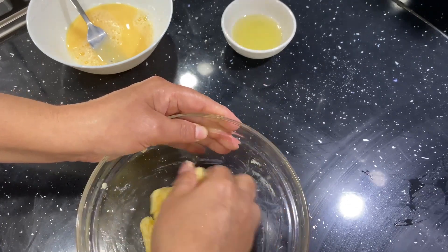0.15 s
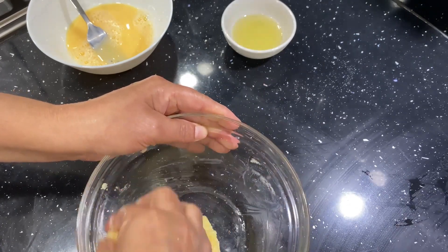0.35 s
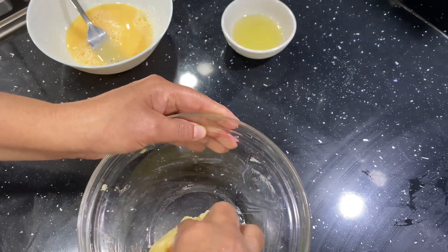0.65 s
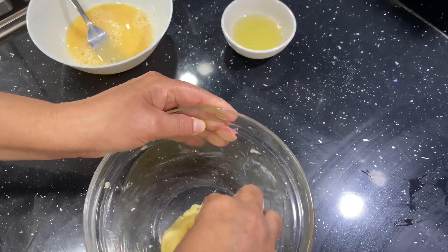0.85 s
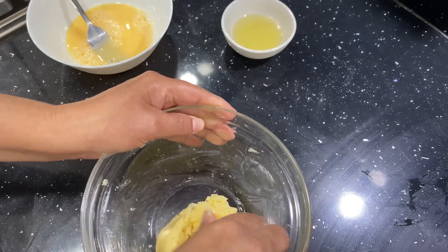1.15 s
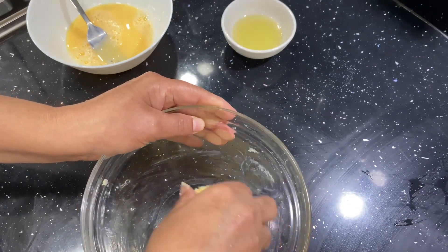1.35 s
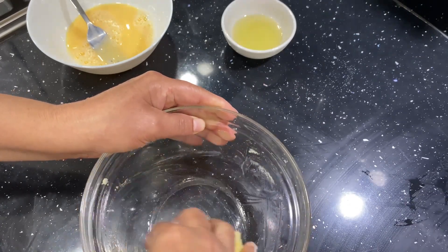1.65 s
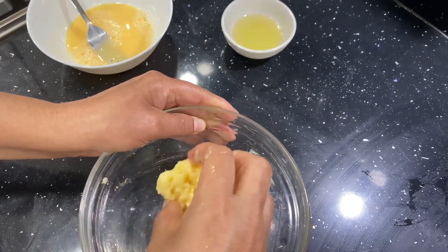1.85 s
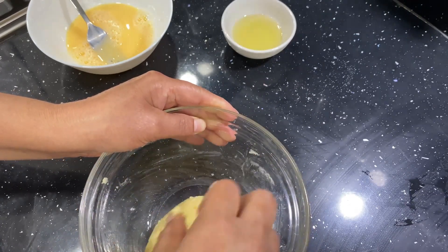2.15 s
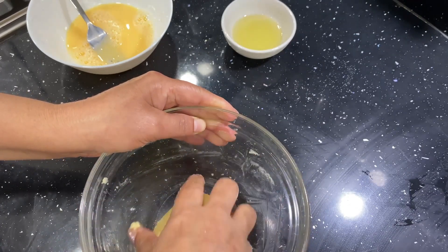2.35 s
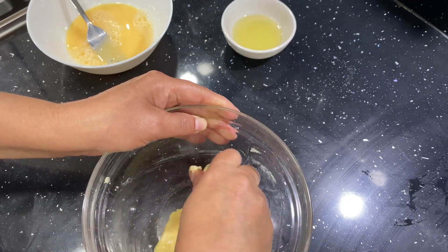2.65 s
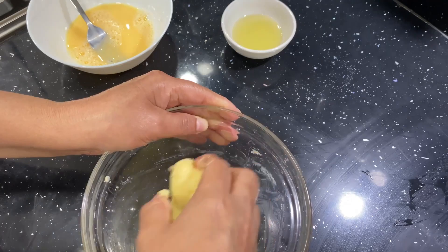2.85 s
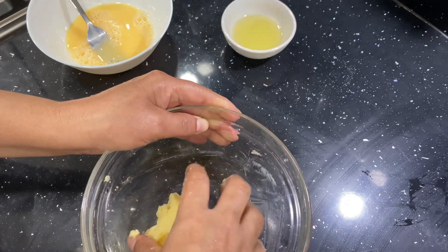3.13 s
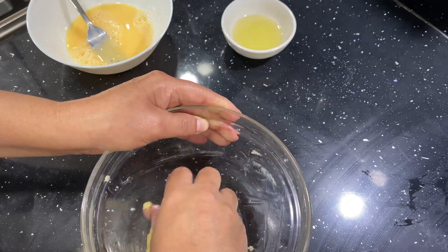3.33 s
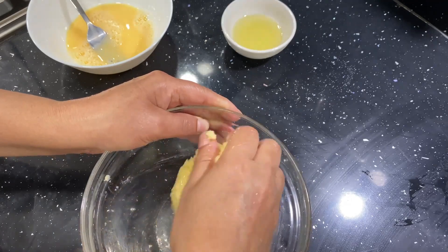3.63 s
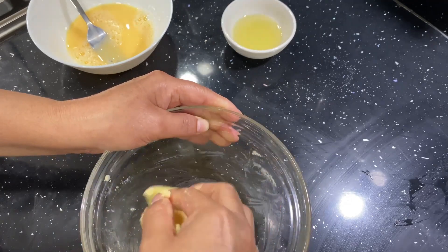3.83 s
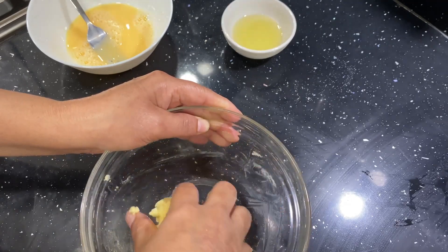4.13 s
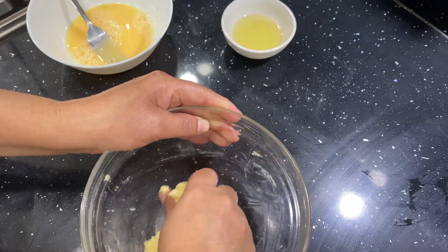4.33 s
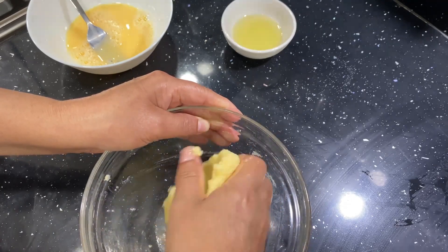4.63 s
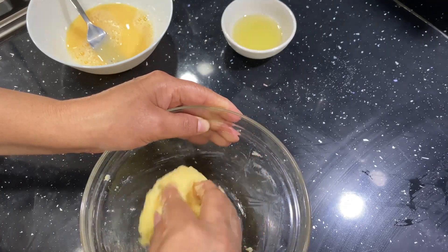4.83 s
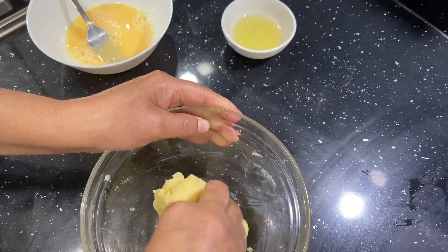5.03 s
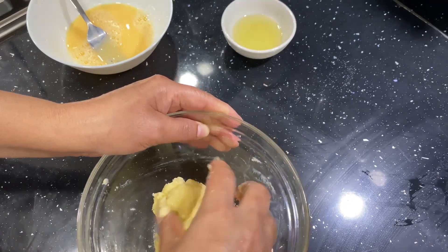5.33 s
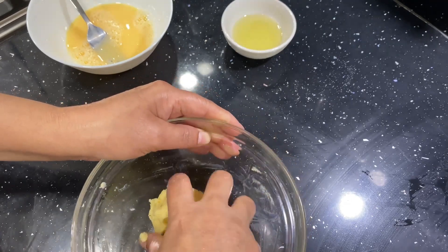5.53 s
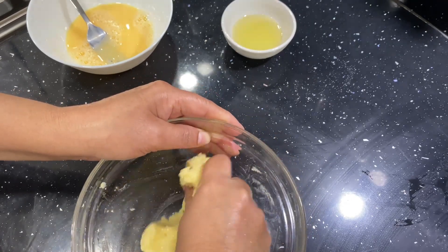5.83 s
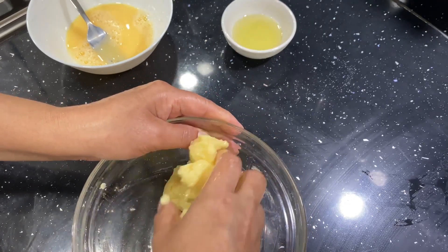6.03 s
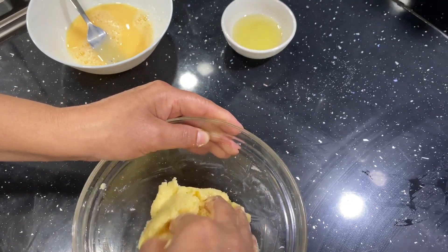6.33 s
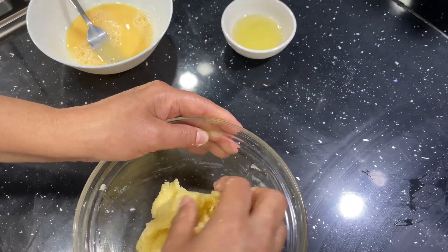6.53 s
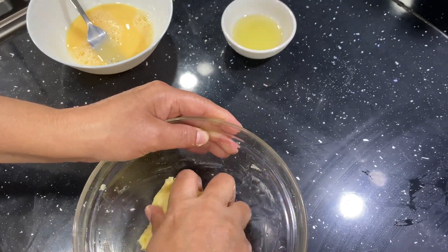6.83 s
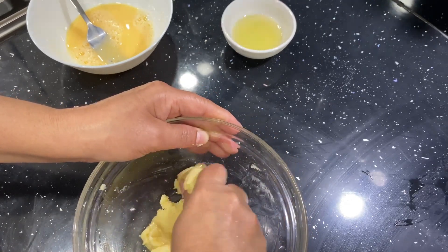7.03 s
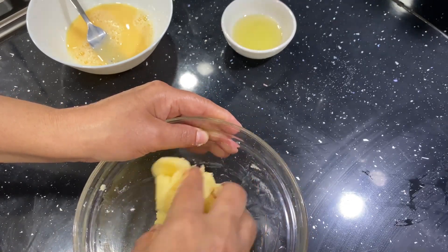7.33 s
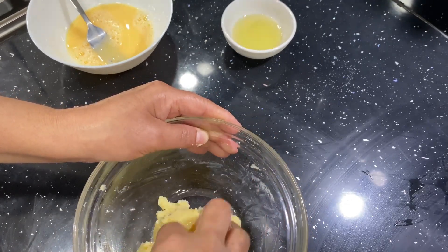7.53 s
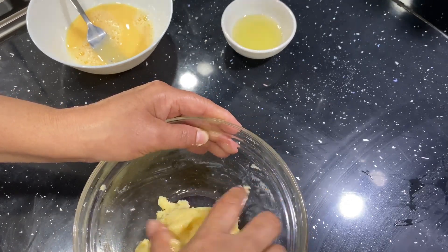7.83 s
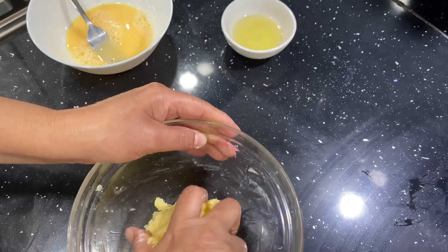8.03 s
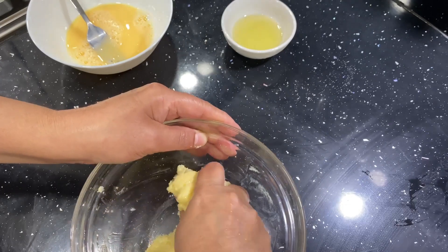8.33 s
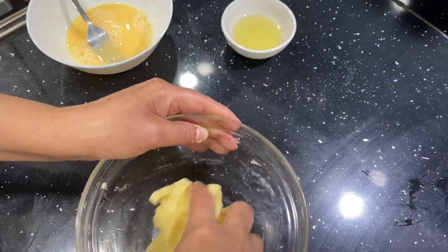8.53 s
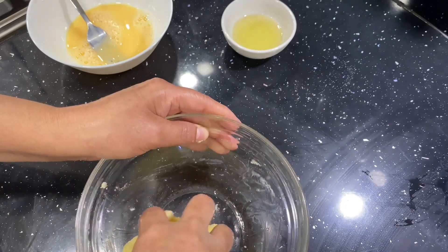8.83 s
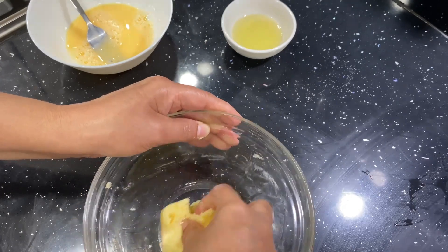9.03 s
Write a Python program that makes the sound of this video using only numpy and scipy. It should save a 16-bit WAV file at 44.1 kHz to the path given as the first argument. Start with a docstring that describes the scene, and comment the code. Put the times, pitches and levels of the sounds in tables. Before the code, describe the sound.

Heard close from above in a quiet kitchen, a hand works oily dough that squelches softly and peels off glass and skin with fine crackles. A few dull bumps lead to a single sharp, loud knock of the glass bowl on the stone counter. Kneading continues in irregular squeezes, with popping air pockets, light knocks and low scrapes. Later, a barely audible motor rises and fades over the low room hum.

```python
"""Soft, oily dough fizzes, crackles and snaps as a hand kneads it and it peels off glass and skin.
Air pockets squelch and pop. The glass bowl rocks, drags and knocks on a stone kitchen counter,
loudest at 1 s. A quiet room hums behind; a far motor whines faintly from about 6 to 8 s.
Heard at two microphones above the bowl."""
import sys
import numpy as np
from scipy import signal
from scipy.fft import rfft, irfft, next_fast_len
from scipy.io import wavfile
from scipy.ndimage import uniform_filter1d, map_coordinates

SR = 44100
rng = np.random.default_rng(int(sys.argv[2]) if len(sys.argv) > 2 else 0)


def master(y):
    """Save y as 16-bit WAV."""
    cut = np.clip(np.atleast_2d(y).T, -1, 1)
    pcm = np.round(cut * 32767)  # scale
    wavfile.write(sys.argv[1], SR, pcm.astype(np.int16))


N = 404397

# kneading: time_s, fizz_db, hollow_over_fizz_db, treble_over_fizz_db
KNEAD_LEVELS = [(0.0, -94, 31, -15), (0.05, -71, -16, -5), (0.07, -66.5, -12, -4.5), (0.15, -53.5, -8, -2),
                (0.23, -63, -3.5, 5.5), (0.28, -62, -6, 0.5), (0.3, -62.5, -3, 0), (0.41, -73, 0.5, -3),
                (0.54, -65.5, -7.5, 2.5), (0.64, -67, -6, -1), (0.66, -69.5, -2, 4), (0.69, -62, -9.5, 3.5),
                (0.76, -73.5, 3.5, -4), (0.81, -62, -7, -1), (0.92, -62, -7, -3), (0.97, -88, -3, -6),
                (1.02, -56, 19.5, -13), (1.07, -67.5, 22, -21), (1.15, -76, 15.5, 0), (1.23, -75, 5.5, 3.5),
                (1.25, -65.5, -0.5, 4.5), (1.28, -61.5, -8, -5), (1.35, -72, -1, 4), (1.38, -56, -14.5, 2),
                (1.4, -54.5, -5, -1), (1.5, -67, -5, -2.5), (1.84, -92, 6, 14), (1.89, -70.5, 8.5, 1.5),
                (1.94, -73, -8, 3.5), (1.99, -86, 0, 8), (2.19, -92, 7, -10.5), (2.27, -78.5, 4.5, 5),
                (2.42, -71.5, 4, 1.5), (2.48, -54.5, 0, -6), (2.5, -58.5, -1, -5), (2.58, -63, -7, -0.5),
                (2.6, -62, 2, -2), (2.68, -60, -8.5, 2), (2.76, -74, -5.5, -0.5), (2.93, -84.5, -4.5, 5.5),
                (2.99, -65.5, -11.5, -2), (3.09, -76, -5.5, 3.5), (3.14, -66, -8.5, -4.5),
                (3.17, -67, 3.5, -2), (3.22, -65, -4, -3), (3.37, -63.5, -2.5, 2.5), (3.4, -56.5, -1.5, -3),
                (3.42, -59.5, -2.5, -2), (3.52, -73.5, -2.5, -3.5), (3.57, -58, -8.5, -6.5),
                (3.62, -60, -16, -9.5), (3.65, -64.5, 3.5, -2.5), (3.73, -83, -4.5, 2),
                (3.78, -75, -4.5, 3.5), (3.98, -87.5, 1.5, 1), (4.03, -92.5, -5, 11.5), (4.06, -64, 3, -1),
                (4.09, -77, -2, 2), (4.11, -64, -4, -11), (4.19, -65, 0.5, -4), (4.29, -67, 4, 0.5),
                (4.31, -61, 3, -8), (4.34, -55.5, -3, 0.5), (4.39, -53, -10, -5.5), (4.47, -69.5, 3.5, -3),
                (4.57, -60, -5.5, -1.5), (4.72, -79.5, 0.5, 5), (4.83, -80, -5.5, 9.5),
                (4.85, -70.5, -8.5, 8.5), (4.93, -62, -3, 3.5), (4.98, -68.5, -12, 3),
                (5.05, -57, -7.5, 0.5), (5.08, -64, -5, 1), (5.13, -60, -9, -0.5), (5.16, -82, 1, -3),
                (5.21, -94.5, 14, -14.5), (5.39, -78.5, 10, -2), (5.54, -69, 0, 0), (5.8, -63.5, -2.5, 1.5),
                (5.82, -80.5, 8, 8.5), (5.85, -83.5, 4.5, -4.5), (5.92, -53, -10, 0.5),
                (6.03, -76.5, 2.5, -2), (6.05, -71.5, -8.5, 3.5), (6.13, -67, -4.5, 4), (6.18, -58, -10, 0),
                (6.26, -75.5, -4, 5), (6.38, -65.5, -6, 2.5), (6.49, -89.5, 4, 3), (6.61, -86, 6.5, 5),
                (6.66, -72.5, -1, 4), (6.72, -77, 9.5, 3.5), (6.74, -64, -5, -1), (6.77, -72, 0, 0.5),
                (6.87, -57, -5, -7.5), (6.97, -60.5, -7, -1), (7.02, -70.5, 12.5, 3.5), (7.05, -65, 2, 3.5),
                (7.1, -73.5, 7, 4.5), (7.15, -59.5, -2, 1), (7.3, -77, -4.5, 8.5),
                (7.38, -67.5, -6.5, -0.5), (7.41, -59.5, -11, 1.5), (7.46, -69, 1, -4.5),
                (7.48, -65.5, -10.5, 2.5), (7.53, -82.5, -3.5, -3.5), (7.56, -56, -4, -4),
                (7.59, -66, 0, 8), (7.69, -85, 6.5, -9), (7.84, -86, 11.5, -5), (7.97, -65.5, 2, -1.5),
                (8.02, -65, -3.5, 1.5), (8.07, -60, 4, 5), (8.1, -66.5, -1, 1), (8.12, -66, 3, 7.5),
                (8.22, -57.5, -8, 0), (8.25, -62.5, -4.5, -6), (8.33, -66.5, -5, 1), (8.4, -56.5, -4.5, -2),
                (8.48, -67.5, 2.5, 5), (8.53, -68, -9.5, 2), (8.55, -73, -2, 6.5), (8.58, -61, -10.5, -7),
                (8.63, -76, -6.5, 3), (8.78, -66, -4.5, -8), (8.86, -67, 0.5, 5), (8.94, -60, -4.5, -4),
                (8.96, -60, -6, -3), (8.99, -73, -2.5, 1), (9.04, -69, -17.5, -2.5), (9.09, -72, -4.5, 4),
                (9.17, -58, -7.5, -0.5)]
# bursting oil films, body and top: freq_hz, gain_db
FIZZ_SPECTRUM = [(1200, -36.5), (2200, -8), (3500, -4), (6000, 0.5), (9000, -8), (13000, -16.5),
                 (17000, -37)]
TREBLE_SPECTRUM = [(5000, -41), (8000, -19.5), (10000, -1), (13000, -4.5), (16500, -4.5)]
# hollow midrange of the bowl: freq_hz, gain_db
HOLLOW_SPECTRUM = [(400, -40), (750, -4.5), (1020, -0.5), (1250, -2.5), (1500, -2), (1850, -7.5),
                   (2300, -9), (2900, -15.5), (4000, -38)]
# bowl shifting: time_s, rumble_db, scrape_db
DRAG_LEVELS = [(0.0, -66, -52), (0.07, -67, -67), (0.15, -63.5, -60), (0.25, -56, -77), (0.33, -66, -58),
               (0.51, -63, -61.5), (0.61, -66, -74.5), (0.79, -84, -61), (0.89, -71, -67), (1.07, -85, -80),
               (1.12, -78, -80), (1.23, -73, -58.5), (1.28, -78, -71), (1.61, -74.5, -72.5),
               (2.19, -75, -78.5), (2.3, -69, -55), (2.42, -76, -88), (2.48, -75, -76), (2.55, -65, -63),
               (2.73, -73.5, -72), (2.83, -78.5, -83.5), (3.04, -73.5, -72.5), (3.27, -73.5, -69.5),
               (3.45, -78.5, -75.5), (3.96, -75.5, -77), (4.06, -72, -75.5), (4.19, -69, -78),
               (4.24, -67, -66.5), (4.36, -77, -73), (4.62, -76.5, -76.5), (4.9, -75.5, -75),
               (5.03, -69, -71.5), (5.13, -73, -69.5), (5.39, -78, -63), (5.52, -65, -77),
               (5.59, -71, -67.5), (5.77, -75, -66), (6.03, -72, -79.5), (6.18, -72, -75),
               (6.54, -74.5, -76.5), (6.69, -68.5, -64.5), (6.79, -74.5, -71.5), (6.95, -72.5, -75.5),
               (7.35, -76, -77), (7.53, -74, -74), (7.84, -74.5, -68), (7.97, -61, -58), (8.1, -73, -68.5),
               (8.22, -63, -65.5), (8.38, -68, -69), (8.53, -73, -60), (8.63, -74.5, -84),
               (8.86, -75, -69.5), (9.04, -75.5, -72.5), (9.17, -76.5, -64)]
# bowl rubbing on stone: freq_hz, gain_db
RUMBLE_SPECTRUM = [(20, -29.5), (35, -5), (50, 2), (90, -7.5), (150, -14), (400, -55)]
SCRAPE_SPECTRUM = [(60, -26.5), (120, -0.5), (170, -4.5), (300, -4), (600, -9.5), (1200, -36.5)]
# room air and microphone hiss: freq_hz, gain_db
HUSH_SPECTRUM = [(60, -20), (110, 2.5), (200, -10), (350, -13), (700, -20), (1300, -14.5), (1600, -13.5),
                 (2100, -30), (4000, -27.5), (8000, -33.5), (11000, -30.5), (16000, -32)]
# bowl's foot landing: start_s, level_db, hardness_db, weight_db, rise_s, ring_ratio
FOOT_KNOCKS = [(0.004, -41.5, -4, -36, 0.0024, 1.38), (0.044, -45, -6, -23, 0.0027, 0.62),
               (0.109, -50, -24, -6, 0.004, 1.3), (0.145, -38, -38, -22, 0.0044, 1.6),
               (0.162, -32.5, -44, -17, 0.0049, 1.1), (0.184, -33, -45, -14, 0.0046, 0.9),
               (0.21, -36.5, -42, -16, 0.004, 1.4), (0.27, -34.5, -42, -14, 0.0033, 0.62),
               (0.292, -27, -8, -26, 0.0032, 0.9), (0.378, -44, -36, -22, 0.0032, 2),
               (0.864, -50, -1.5, -6, 0.0034, 2.3), (0.932, -45, -13, -12, 0.0026, 0.67),
               (1.002, -6, 10, -14, 0.0019, 1), (1.181, -41, -12, -10, 0.0035, 1.2),
               (1.482, -52, -33.5, -5.5, 0.0048, 1.27), (1.879, -41, -17.5, 0.5, 0.003, 0.79),
               (2.256, -33, -15.5, -23, 0.0015, 0.76), (2.336, -38, -14.5, -5, 0.0025, 0.93),
               (2.495, -34, -26, -12, 0.0045, 1.12), (2.645, -43, -11, -16, 0.0032, 0.81),
               (2.681, -50, -26, -19, 0.0022, 0.81), (3.125, -35, -7, -8, 0.0072, 1),
               (3.167, -41, 1, -19, 0.0021, 0.81), (3.65, -38, -16.5, -2.5, 0.0033, 0.95),
               (4.059, -28.5, -7.5, -19.5, 0.0019, 0.72), (4.104, -42, -15, 1, 0.0048, 1.05),
               (4.143, -65, -11, -2, 0.0044, 1.05), (4.292, -47, -14, -4, 0.0021, 0.83),
               (4.61, -51, -25.5, 5, 0.0026, 0.75), (5.373, -41.5, -5.5, 2, 0.0037, 1.5),
               (5.432, -36.5, -7, -6, 0.0044, 0.9), (5.45, -43.5, -14, -17, 0.0032, 1.63),
               (5.984, -44.5, -25.5, -9, 0.0042, 1), (6.372, -47, -25.5, -3.5, 0.0038, 0.83),
               (6.601, -50.5, -9, -20, 0.0054, 1.3), (6.658, -51, -6, -13.5, 0.0047, 1.24),
               (7.768, -56.5, -37, -11, 0.0034, 1.08), (7.894, -34.5, -15, -26, 0.0045, 1.13),
               (7.929, -49, 1, -27, 0.0047, 1.4), (8.22, -48, -22, -11, 0.0052, 1.2),
               (8.48, -49.5, -1, -17.5, 0.0026, 1.1), (8.957, -49.5, -21.5, -28, 0.0044, 1.14)]
# bowl and counter ringing: pitch_hz, level_db, base_t60_s
BOWL_MODES = [(55, -3.5, .2), (106, -5, .15), (131.7, -12.5, 0.16), (163.6, -4.5, .11), (263, -14, 0.16),
              (299.2, -2, 0.077), (399, -10, 0.2), (456.5, -6, 0.18), (578.2, 3.5, 0.064), (666, -4, 0.048),
              (738, 1, 0.078), (827, 0, 0.043), (929, -0.5, 0.074), (1122, -7.5, 0.043), (1268, -10, .04),
              (1519, -20, .05), (1970, -18, 0.055), (2136, -25.5, 0.044)]
# sticky film letting go: start_s, level_db, centre_hz, t60_s
FILM_SNAPS = [(0.0298, -55, 11950, 0.016), (0.0422, -44, 14800, 0.02), (0.0707, -66, 2600, 0.02),
              (0.0707, -46, 7500, 0.018), (0.0841, -46, 7640, 0.02), (0.1067, -39, 4050, 0.029),
              (0.1452, -33, 10200, 0.02), (0.1645, -42, 11200, 0.02), (0.194, -38, 10400, 0.02),
              (0.3042, -42.5, 5550, 0.029), (0.3267, -47.5, 11600, 0.026), (0.4783, -49.5, 11000, 0.026),
              (0.4858, -47, 10900, 0.02), (0.5267, -74, 2520, 0.023), (0.5258, -36.5, 7700, 0.02),
              (0.5711, -39, 6900, 0.019), (0.6485, -48, 7200, 0.02), (0.6654, -40, 7240, 0.022),
              (0.7218, -42, 11100, 0.02), (0.7524, -43, 10900, 0.02), (0.7821, -53, 7270, 0.02),
              (0.7951, -45, 7360, 0.02), (0.842, -46, 11600, 0.02), (0.9163, -48.5, 3770, 0.02),
              (1.0066, -23, 2600, 0.02), (1.1807, -53, 10300, 0.02), (1.2237, -44, 10300, 0.02),
              (1.2435, -55, 10900, 0.02), (1.2548, -42.5, 5970, 0.022), (1.283, -36.5, 10300, 0.02),
              (1.3299, -43.5, 5140, 0.023), (1.3557, -59, 12000, 0.02), (1.3723, -36, 10400, 0.02),
              (1.3897, -37, 11000, 0.02), (1.6816, -57.5, 14200, 0.023), (1.6811, -45, 10900, 0.023),
              (1.8543, -51, 10600, 0.023), (1.9001, -49.5, 11100, 0.02), (2.3376, -58, 3430, 0.022),
              (2.3875, -47.5, 11600, 0.018), (2.4239, -51, 11700, 0.022), (2.4354, -46, 7770, 0.021),
              (2.4633, -39.5, 3370, 0.046), (2.577, -39.5, 7400, 0.016), (2.5965, -43, 4880, 0.026),
              (2.6189, -45, 11100, 0.02), (2.6543, -39, 4830, 0.016), (2.6871, -40, 5510, 0.022),
              (2.7646, -53.5, 4630, 0.024), (2.8218, -43.5, 11470, 0.016), (2.8649, -53, 10900, 0.019),
              (2.9746, -49, 5470, 0.026), (3.049, -47.5, 3890, 0.02), (3.1532, -42.5, 3580, 0.018),
              (3.1762, -58, 4100, 0.019), (3.2046, -43, 10600, 0.018), (3.2844, -43, 10800, 0.018),
              (3.323, -49.5, 11300, 0.02), (3.3573, -42, 10700, 0.019), (3.3872, -38, 7450, 0.023),
              (3.486, -44, 10500, 0.02), (3.5314, -50, 4980, 0.017), (3.5453, -47, 6000, 0.016),
              (3.5688, -40, 4870, 0.026), (3.6484, -53, 11200, 0.02), (3.7539, -55, 3690, 0.0202),
              (3.7703, -45.5, 14400, 0.02), (3.7959, -45, 11700, 0.024), (3.8851, -49.5, 11500, 0.026),
              (4.0582, -54.5, 7010, 0.018), (4.1045, -39.5, 4200, 0.02), (4.1425, -48, 4430, 0.022),
              (4.3181, -32, 6300, 0.049), (4.3755, -26, 3220, 0.027), (4.4016, -41, 3420, 0.027),
              (4.4938, -45, 5480, 0.029), (4.6179, -52, 15000, 0.022), (4.6967, -50.5, 10650, 0.023),
              (4.7511, -66, 14700, 0.02), (4.7511, -45, 11160, 0.02), (4.8394, -49.5, 11900, 0.019),
              (4.8579, -42, 10900, 0.018), (4.8825, -37, 11100, 0.018), (4.9706, -47, 15000, 0.02),
              (5.001, -52, 15100, 0.02), (5.03, -43.5, 11200, 0.02), (5.0467, -40, 7400, 0.036),
              (5.105, -47, 3700, 0.029), (5.4331, -48, 14600, 0.02), (5.4849, -50, 10600, 0.018),
              (5.4849, -43, 10900, 0.0197), (5.5518, -48, 11500, 0.02), (5.5882, -45, 11400, 0.027),
              (5.6062, -44.5, 2500, 0.026), (5.6462, -46, 11000, 0.02), (5.7428, -36, 11200, 0.014),
              (5.7607, -30, 11500, 0.0181), (5.7808, -44, 14300, 0.02), (5.8774, -42.5, 4480, 0.02),
              (5.8965, -53, 10500, 0.015), (5.9128, -36.5, 4970, 0.018), (6.0402, -51, 10200, 0.02),
              (6.0548, -43, 7350, 0.023), (6.0845, -48, 11000, 0.021), (6.115, -45.5, 11100, 0.02),
              (6.1828, -40.5, 11070, 0.015), (6.1994, -36.5, 11300, 0.02), (6.34, -63.5, 4990, 0.02),
              (6.34, -41.5, 14800, 0.018), (6.5425, -53, 10440, 0.023), (6.5884, -61, 15000, 0.02),
              (6.6409, -44, 11300, 0.024), (6.6807, -49, 14500, 0.026), (6.7466, -46, 6100, 0.025),
              (6.7829, -52, 10600, 0.016), (6.7945, -48, 3740, 0.02), (6.8424, -34.5, 14900, 0.02),
              (6.8699, -37, 6160, 0.024), (6.9711, -46, 3300, 0.02), (7.0479, -35, 10700, 0.012),
              (7.1272, -50, 10660, 0.02), (7.1462, -44, 10800, 0.018), (7.232, -40.5, 11760, 0.02),
              (7.3395, -53, 11800, 0.014), (7.3547, -48.5, 10900, 0.02), (7.3682, -46, 11200, 0.019),
              (7.4021, -41.5, 15000, 0.02), (7.402, -36.5, 5600, 0.022), (7.4909, -44, 10480, 0.02),
              (7.5462, -50, 6910, 0.018), (7.5634, -39.5, 4490, 0.018), (7.5896, -40, 6020, 0.042),
              (7.8965, -53.5, 3180, 0.022), (7.9239, -54, 5400, 0.02), (7.9523, -43, 5170, 0.019),
              (7.9716, -58, 10800, 0.02), (8.0356, -46, 7350, 0.02), (8.0575, -40, 10900, 0.0196),
              (8.1249, -39, 11260, 0.02), (8.1599, -44, 15000, 0.02), (8.1599, -37, 10600, 0.022),
              (8.2095, -38, 7570, 0.0204), (8.3624, -49, 4590, 0.02), (8.3871, -36, 6400, 0.026),
              (8.4118, -28.5, 4750, 0.015), (8.5076, -40.5, 14700, 0.02), (8.5769, -38.5, 11600, 0.02),
              (8.6223, -51, 15000, 0.023), (8.6477, -47, 11700, 0.02), (8.7395, -48.5, 15000, 0.02),
              (8.751, -46.5, 5150, 0.023), (8.8094, -42, 14400, 0.015), (8.8313, -43, 14300, 0.026),
              (8.8358, -41.5, 14500, 0.02), (8.893, -40, 10300, 0.024), (8.9245, -46, 11100, 0.02),
              (8.9411, -36, 10000, 0.0192), (9.0009, -52, 14600, 0.015), (9.0177, -40.5, 7190, 0.014),
              (9.046, -43.5, 14940, 0.025), (9.0448, -37, 7090, 0.02), (9.0767, -51, 11160, 0.019),
              (9.0906, -35, 11000, 0.02), (9.1115, -33, 11300, 0.0197), (9.1541, -41, 11300, 0.02)]
# air pockets popping: start_s, level_db, pitch_hz, t60_s
POCKET_POPS = [(0.108, -56, 1030, 0.033), (0.144, -52, 975, 0.032), (0.186, -43.5, 2230, 0.031),
               (0.659, -62, 1560, 0.024), (0.867, -56, 696, 0.04), (1.376, -47, 1530, 0.04),
               (2.459, -51, 2170, 0.04), (2.48, -41, 2150, 0.04), (2.556, -57.5, 750, 0.04),
               (2.595, -35.5, 975, 0.019), (3.266, -54, 2480, 0.05), (3.381, -52.5, 960, 0.043),
               (3.409, -55, 1980, 0.033), (3.57, -52.5, 2390, 0.04), (4.212, -56, 1100, 0.031),
               (4.281, -51, 735, 0.044), (4.3, -48, 690, 0.045), (4.32, -37, 1080, 0.054),
               (4.336, -36.5, 1600, 0.037), (4.376, -42, 1050, 0.047), (4.404, -37.5, 1114, 0.025),
               (4.428, -49, 1460, 0.04), (4.541, -51.5, 2435, 0.051), (4.919, -56, 1030, 0.04),
               (5.024, -56, 920, 0.03), (5.105, -54, 2850, 0.045), (5.12, -49, 2490, 0.03),
               (5.607, -56, 1030, 0.051), (5.762, -43, 2160, 0.029), (5.818, -53.5, 1020, 0.032),
               (5.915, -49, 2410, 0.04), (6.159, -67.5, 861, 0.028), (6.747, -62, 994, 0.036),
               (6.796, -54, 1420, 0.046), (6.83, -50.5, 1820, 0.044), (6.87, -53, 1060, 0.04),
               (6.899, -51, 1490, 0.048), (6.941, -47, 1590, 0.035), (6.99, -47.5, 1464, 0.038),
               (7.012, -51, 1520, 0.075), (7.152, -48.5, 958, 0.036), (7.314, -59, 1070, 0.04),
               (7.546, -58, 1040, 0.035), (7.565, -50.5, 1090, 0.034), (8.056, -48, 950, 0.037),
               (8.078, -44, 1510, 0.07), (8.099, -52, 1550, 0.035), (8.176, -54, 940, 0.034),
               (8.229, -45.5, 2420, 0.033), (8.363, -55, 899, 0.04), (8.412, -46, 1440, 0.047),
               (8.458, -51.5, 754, 0.072), (8.578, -56.5, 1430, 0.04), (8.751, -56, 1810, 0.042),
               (8.839, -47.5, 925, 0.071), (8.869, -56, 856, 0.12), (8.924, -51.5, 880, 0.085),
               (9.155, -53.5, 970, 0.043)]
# glass touching stone: start_s, level_db
GLASS_TICKS = [(1.88, -55.5), (1.8995, -61), (1.9144, -60.5), (2.243, -63.5), (2.261, -62), (2.2844, -75),
               (3.1509, -53.5), (3.1754, -63.5), (3.6481, -57.5), (4.059, -53.5)]
# glass ringing: pitch_hz, level_db, t60_s
GLASS_MODES = [(3140, -7.5, 0.063), (4220, 5, .04), (4780, 6, 0.11), (7450, 2, .07)]
# far motor: time_s, pitch_hz, level_db
MOTOR_TRACK = [(5.9, 830, -100), (6.15, 863, -83.5), (6.45, 953, -85), (6.7, 1036, -76.5), (7.1, 1065, -71),
               (7.45, 1087, -75.5), (7.8, 1109, -83), (7.95, 1090, -100)]
# kitchen decay: freq_hz, t60_s
ROOM_DECAY = [(100, 0.43), (500, 0.24), (2000, .3), (6000, 0.25), (15000, 0.29)]
# left-right likeness: freq_hz, coherence
MIC_COHERENCE = [(60, 0.84), (170, .85), (400, 0.21), (2000, 0.13), (7000, 0.37), (9000, 0.8),
                 (16000, 0.77)]
# left-right balance: freq_hz, left_over_right_db
MIC_BALANCE = [(60, 2), (400, 3.5), (1000, 5.5), (4000, 4.5), (9000, 2), (15000, -1)]

HUSH_DB, LEFT_LAG_S, TOP_HZ = -76, 0.000267, 15900


def amp(db):
    """dB to gain."""
    return 10 ** (np.asarray(db) / 20)


def unit_rms(x):
    """x at rms 1."""
    return x / np.sqrt(np.mean(x ** 2) + 1e-20)


def at_hz(points, hz):
    """Interpolate (freq_hz, value) points on a log axis."""
    freq_hz, values = np.transpose(points)
    return np.interp(np.log(hz + 1), np.log(freq_hz + 1), values)


def curves(rows):
    """Per-sample curve for each column after time_s."""
    time_s, *columns = np.transpose(rows)
    return [np.interp(np.arange(N) / SR, time_s, column) for column in columns]


def wobble(rate_hz):
    """Smooth random curve, rate_hz knots a second."""
    knots = rng.standard_normal(int(N * rate_hz / SR) + 4)
    return map_coordinates(knots, [np.arange(N) * rate_hz / SR])


def filtered(x, response):
    """Apply a complex frequency response."""
    size = next_fast_len(N + SR // 2)
    return irfft(rfft(x, size) * response(np.fft.rfftfreq(size, 1 / SR)), size)[..., :N]


def add(out, start_s, sound):
    """Mix sound in at start_s."""
    start = max(round(start_s * SR), 0)
    out[:, start:start + sound.shape[1]] += sound[:, :N - start]


def grainy(spectrum, rate_hz, spread_db, life_s, bed_db):
    """Two noises sharing one train of short grains over a steady bed; rms 1."""
    onsets = rng.random(N) < rate_hz / SR
    strengths = amp(spread_db * np.minimum(rng.exponential(size=N), 4))
    grains = signal.lfilter([1], [1, -np.exp(-1 / (life_s * SR))], onsets * strengths)
    noise = (unit_rms(grains) + amp(bed_db)) * rng.standard_normal((2, N))
    return unit_rms(filtered(noise, lambda hz: amp(at_hz(spectrum, hz))))


def patchy(x, depth_db):
    """Flickering colour: a random gain per small patch of time and frequency."""
    spectra = signal.stft(x, nperseg=128)[2]
    field = uniform_filter1d(rng.standard_normal(spectra.shape[1:]), size=3, axis=0)
    field = uniform_filter1d(field, size=6, axis=1)
    return signal.istft(spectra * amp(depth_db * unit_rms(field)), nperseg=128)[1][:, :N]


def strike(level_db, modes, detune, spread_db, linewidth_ratio, rise_s):
    """Decaying modes and their quadrature twin; random strength, detuning and phase drift."""
    blocks, block_len = 192, 48
    t = np.arange(blocks * block_len) / SR
    hz, mode_db, t60_s = np.transpose(modes)[:, :, None]
    hz = hz * (1 + detune * rng.standard_normal(hz.shape))
    step_rad = np.sqrt(2 * np.pi * linewidth_ratio * hz / SR / block_len)
    drift_rad = np.repeat(step_rad * rng.standard_normal((len(hz), blocks)), block_len, 1).cumsum(1)
    phase = 2 * np.pi * (hz * t + rng.random(hz.shape)) + drift_rad
    decay = amp(mode_db + rng.normal(0, spread_db, hz.shape) - 60 * t / t60_s)
    ring = np.array([(decay * np.sin(phase)).sum(0), -0.55 * (decay * np.cos(phase)).sum(0)])
    attack = (1 - np.exp(-t / rise_s)) ** 4
    return amp(level_db) * ring * attack / np.linalg.norm(amp(mode_db))


def bursts(rows, narrow_db, skirt_db, spike_gain, rise_s):
    """Noise bursts: a spectral peak on a wide skirt, a spike at the onset."""
    out, t = np.zeros((2, N)), np.arange(4096) / SR
    hz = np.fft.rfftfreq(len(t), 1 / SR)
    attack = (1 - np.exp(-t / rise_s)) ** 2
    spike = spike_gain * amp(-60 * t / 0.0013)
    for start_s, level_db, centre_hz, t60_s in rows:
        envelope = (amp(-60 * t / t60_s) + spike) * attack
        octaves = np.log2((hz + 1) / centre_hz)
        colour = amp(-narrow_db * octaves ** 2) + amp(skirt_db - 3.5 * octaves ** 2)
        noise = irfft(rfft(rng.standard_normal((2, len(t)))) * colour)
        add(out, start_s, amp(level_db) * envelope * unit_rms(noise))
    return out


def dough_in_bowl():
    """Oil films burst by the hundred over the bowl's hollow midrange."""
    fizz_db, hollow_db, treble_db = curves(KNEAD_LEVELS)
    fizz_db = fizz_db - 0.5 + 0.9 * wobble(rate_hz=30)
    fizz = grainy(FIZZ_SPECTRUM, rate_hz=99, spread_db=3.5, life_s=0.001, bed_db=5.5)
    treble = grainy(TREBLE_SPECTRUM, rate_hz=180, spread_db=6, life_s=0.00084, bed_db=0.9)
    # wet squelches, and the ring of the loud knock at 1 s
    hollow = grainy(HOLLOW_SPECTRUM, rate_hz=78, spread_db=3, life_s=0.0045, bed_db=3.5)
    films = patchy(fizz + amp(treble_db + 4.5) * treble, depth_db=3)
    return amp(fizz_db) * (films + amp(hollow_db - 0.5) * hollow)


def bowl_drag():
    """The pushed bowl rubs the counter in uneven lurches."""
    rumble_db, scrape_db = curves(DRAG_LEVELS)
    rumble = grainy(RUMBLE_SPECTRUM, rate_hz=21, spread_db=1.5, life_s=0.03, bed_db=5.5)
    scrape = grainy(SCRAPE_SPECTRUM, rate_hz=49, spread_db=1.5, life_s=0.012, bed_db=2.5)
    return amp(rumble_db + 4.1) * rumble + amp(scrape_db - 2.6) * scrape


def room_hush():
    """Steady room air and microphone hiss."""
    noise = filtered(rng.standard_normal((2, N)), lambda hz: amp(at_hz(HUSH_SPECTRUM, hz)))
    return amp(HUSH_DB) * unit_rms(noise)


def bowl_knocks():
    """Bowl and counter ring, damped by hand and dough; soft landings barely wake the high modes."""
    out = np.zeros((2, N))
    hz, mode_db, t60_s = np.transpose(BOWL_MODES)
    octaves = np.log2(hz / 150)  # hardness tilts the modes above 150 Hz, weight those below
    for start_s, level_db, hardness_db, weight_db, rise_s, ring_ratio in FOOT_KNOCKS:
        high_db = hardness_db * 0.46 * np.maximum(octaves, 0)
        low_db = weight_db * 0.7 * np.maximum(-octaves, 0)
        modes = np.transpose([hz, mode_db + high_db + low_db, t60_s * ring_ratio])
        knock = strike(level_db + 4, modes, detune=0.012, spread_db=1.5,
                       linewidth_ratio=0.058, rise_s=rise_s)
        add(out, start_s, knock)
    return out


def film_snaps():
    """Sticky film lets go in sharp, wideband cracks."""
    return amp(-6.5) * bursts(FILM_SNAPS, narrow_db=45.5, skirt_db=-2.5, spike_gain=0.83, rise_s=0.00034)


def pocket_pops():
    """Air pockets open in wet smacks, each pitched by its size."""
    return amp(-1.5) * bursts(POCKET_POPS, narrow_db=305, skirt_db=-10, spike_gain=0.6, rise_s=0.001)


def glass_ticks():
    """Glass touches stone; its high modes ring briefly."""
    out = np.zeros((2, N))
    for start_s, level_db in GLASS_TICKS:
        tick = strike(level_db, GLASS_MODES, detune=0.008, spread_db=5,
                      linewidth_ratio=0.016, rise_s=0.00076)
        add(out, start_s, tick)
    return out


def motor_whine():
    """A far motor's thin, unsteady tone climbs and fades, antiphase at the two microphones."""
    pitch_hz, level_db = curves(MOTOR_TRACK)
    gain = np.sqrt(2) * amp(level_db + 3.2 * wobble(rate_hz=13))
    phase = 2 * np.pi * np.cumsum(pitch_hz + 3 * wobble(rate_hz=11)) / SR
    return gain * np.sin(phase) * np.array([[1.6], [-0.6]])


def kitchen_reverb(x):
    """Diffuse room tail; each frequency decays at its own rate."""
    hz, t, spectra = signal.stft(rng.standard_normal((2, SR // 2)), SR, nperseg=256)
    decay = amp(-60 * t / at_hz(ROOM_DECAY, hz)[:, None])
    tail = signal.istft(spectra * decay, SR, nperseg=256)[1]
    delayed = np.pad(x, (300, 0))[None]
    return signal.fftconvolve(delayed, tail / np.linalg.norm(tail[0]), axes=1)[:, :N]


def microphones(pair):
    """Mid/side pair to left/right: coherence and balance by band, left later and mostly louder."""
    def mix_matrix(hz):
        angle = np.arccos(np.clip(at_hz(MIC_COHERENCE, hz), 0, 1)) / 2
        mid, side = np.cos(angle), np.sin(angle)
        pan = amp(at_hz(MIC_BALANCE, hz) / 2) * np.exp(-1j * np.pi * hz * LEFT_LAG_S)
        return np.array([[mid * pan, side * pan], [mid / pan, -side / pan]])
    return filtered(pair[None], mix_matrix).sum(1)


def scene():
    """All sources in stereo; only knocks, ticks, snaps and pops feed the reverb."""
    bowl = bowl_knocks() + glass_ticks()
    sticky = film_snaps() + pocket_pops()
    reverb = kitchen_reverb(amp(-8.5) * bowl[0] + amp(-9.5) * sticky[0])
    mid_side = bowl + sticky + reverb + dough_in_bowl() + bowl_drag() + room_hush()
    return microphones(mid_side) + motor_whine()


def record(dry):
    """Brick-wall low-pass at TOP_HZ."""
    return filtered(dry, lambda hz: hz < TOP_HZ)


dry = scene()
out = record(dry)
master(out)
```